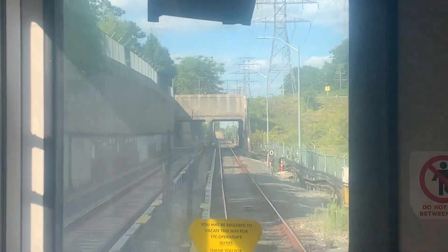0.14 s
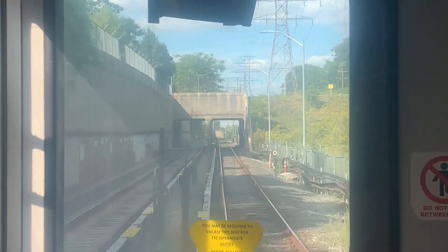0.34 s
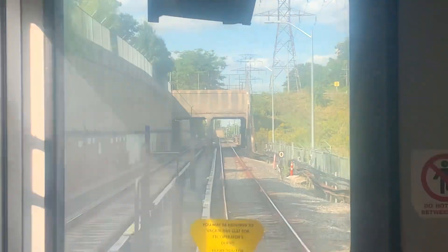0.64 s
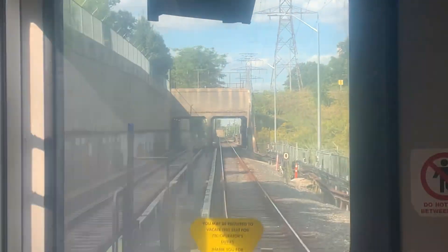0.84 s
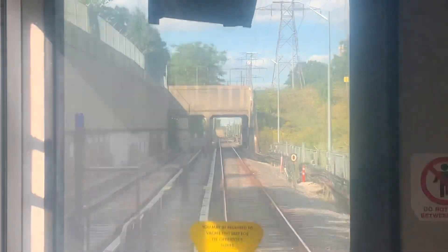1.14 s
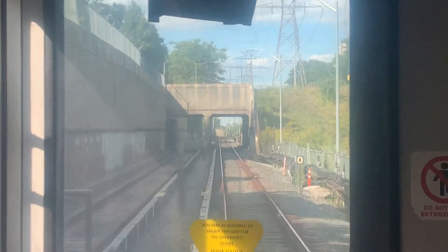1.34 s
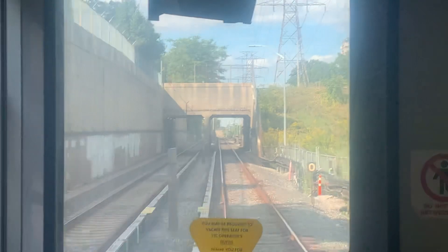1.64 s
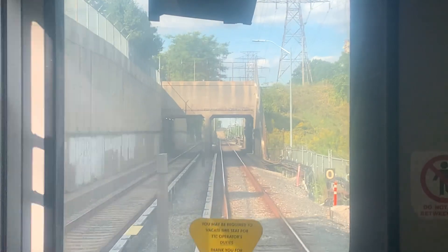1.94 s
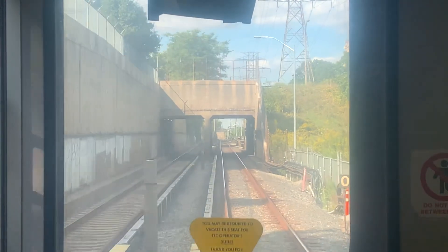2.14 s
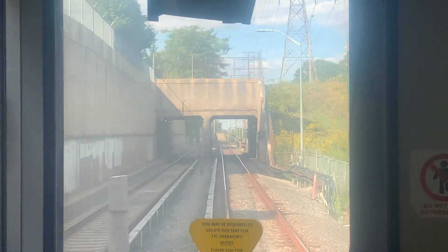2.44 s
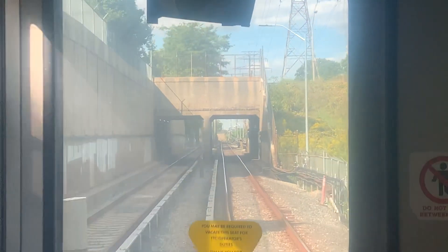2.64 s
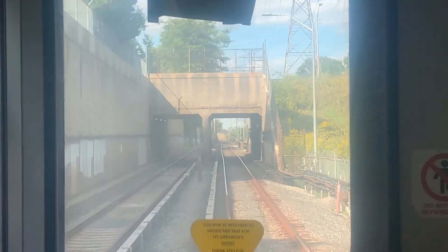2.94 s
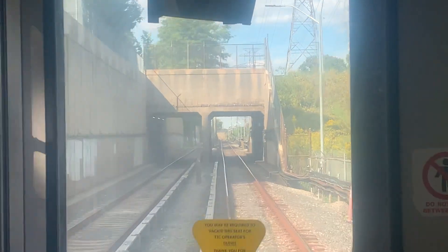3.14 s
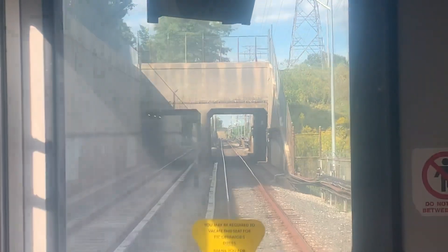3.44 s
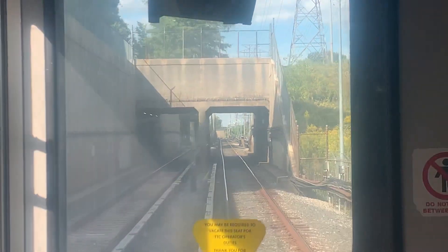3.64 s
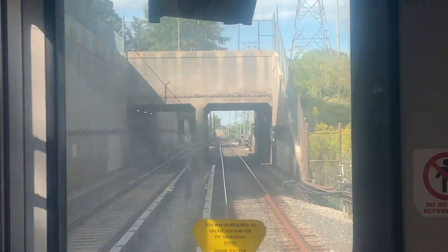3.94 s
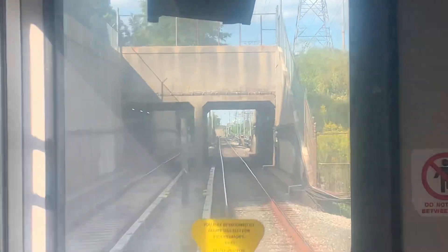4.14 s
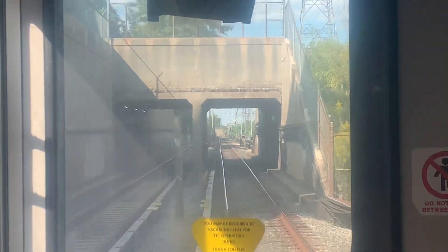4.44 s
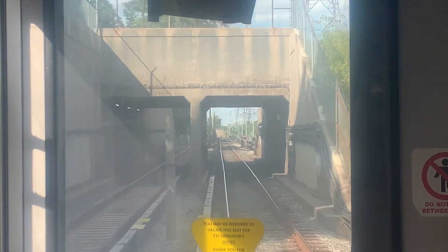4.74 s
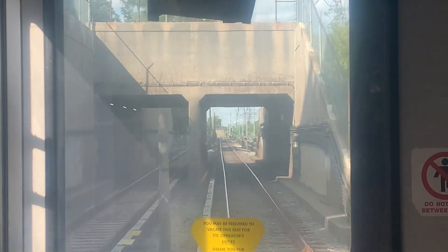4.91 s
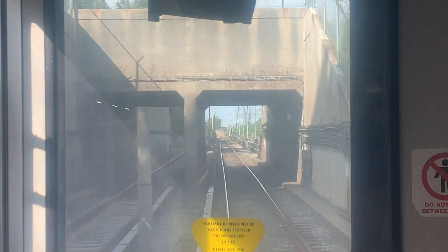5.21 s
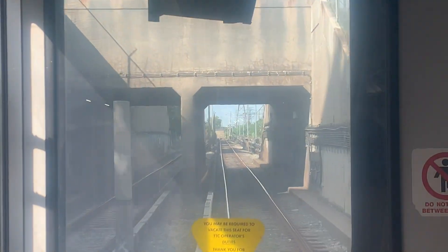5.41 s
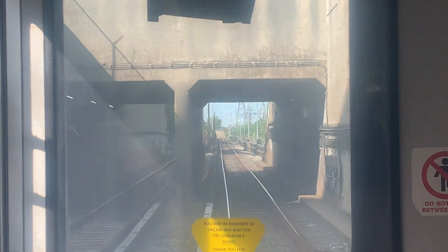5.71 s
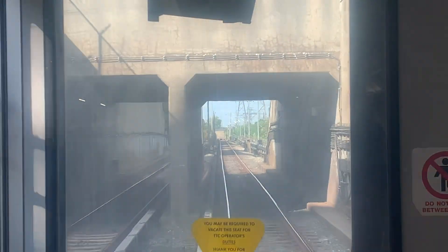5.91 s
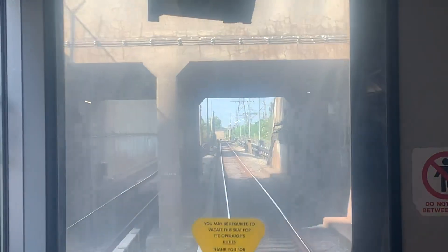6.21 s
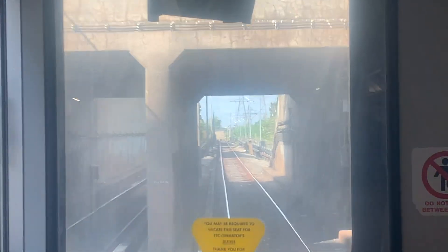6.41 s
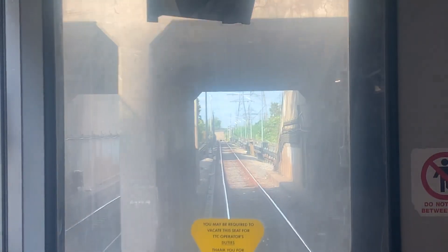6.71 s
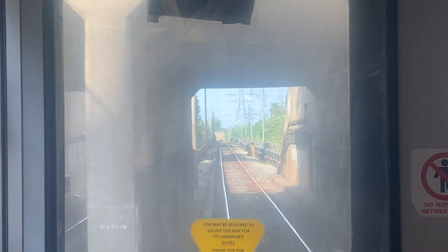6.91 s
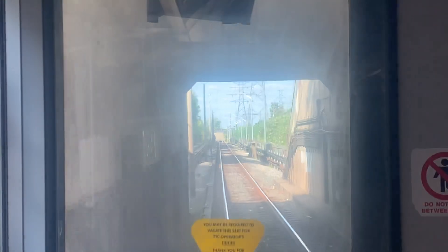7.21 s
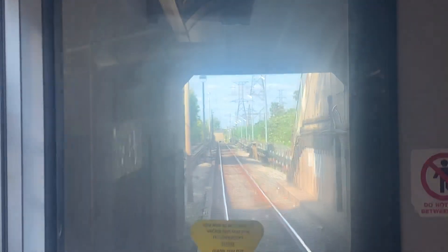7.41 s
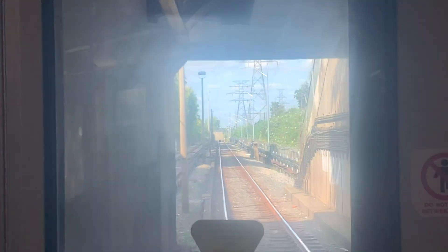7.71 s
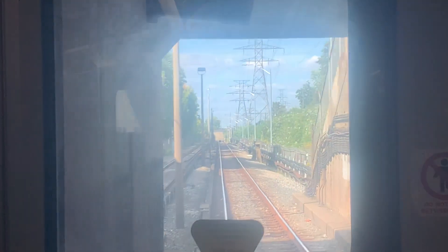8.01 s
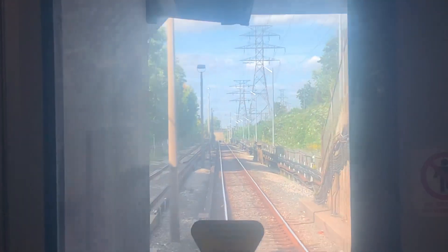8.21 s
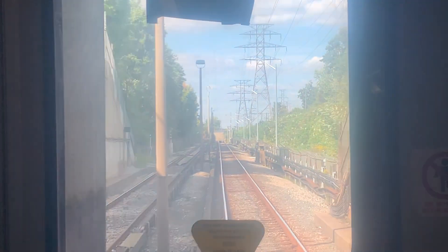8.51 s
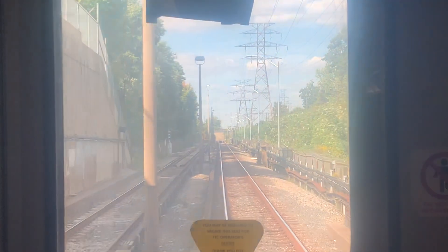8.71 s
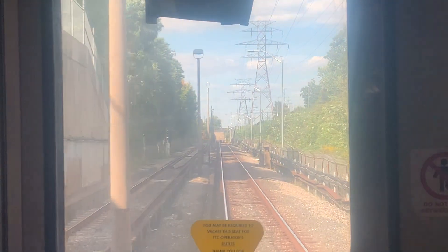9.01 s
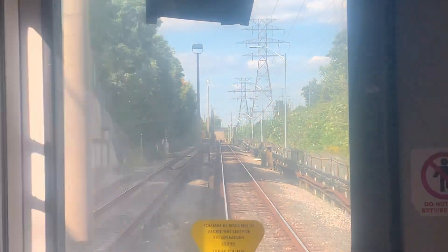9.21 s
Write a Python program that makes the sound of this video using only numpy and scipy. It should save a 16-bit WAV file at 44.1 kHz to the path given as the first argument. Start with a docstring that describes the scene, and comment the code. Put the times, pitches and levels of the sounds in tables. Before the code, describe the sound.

Inside the front car of a commuter train, a deep rumble, cabin drone and rough wheel roar run throughout. Loud, close panel knocks pop during the first three seconds while wheels crash over rail joints and air hisses in bursts at a door seal. A calmer stretch brings two small hollow taps, then the rolling swells under a bridge with rattling thumps and shuddering walls before easing. Close stereo microphone.

```python
"""Inside the front car of a rolling commuter train, 9.35 s, on two close microphone ports.
From the start noise bands boom, drone and roar; a loose panel near the ports knocks as falling sweeps until 3 s.
Wheels crash over joints from 1.1 to 3.7 s (shaped noise, ringing ticks), and air hisses in bursts at a door seal.
A thin tone swells at 2.2 s, and two hollow taps (decaying sines) follow at 4.8 s.
Near 7.6 s the rolling grows louder under a bridge, with more joints, floor thumps and wall shudders (short rings)."""
import sys
import numpy as np
from scipy import signal
from scipy.fft import rfft, irfft, next_fast_len
from scipy.io import wavfile
from scipy.ndimage import uniform_filter1d, minimum_filter1d, map_coordinates

SR = 44100
rng = np.random.default_rng(int(sys.argv[2]) if len(sys.argv) > 2 else 0)


def pcm_store(signal):
    """Save signal as 16-bit PCM."""
    levels = np.round(np.clip(np.atleast_2d(signal), -1, 1) * 32767)
    wavfile.write(sys.argv[1], SR, levels.astype(np.int16).T)


N = 412335  # length [samples]

# Body of the car rocking: (time [s], level [dB])
SWAY_LEVELS = [(0, -41), (1.3, -31.5), (1.85, -37), (2.11, -33), (6.8, -38), (7.58, -51), (9.35, -41)]
# Colour of the rocking: (frequency [Hz], relative density [dB per Hz])
SWAY_COLOUR = [(12, -21), (22, -3), (30, 0.5), (38, -2), (48, -18), (60, -100)]

# Rolling: (time [s], floor boom [dB], cabin drone [dB], wall hum [dB], wheel roar [dB])
ROLL_LEVELS = [(0.0, -23.5, -35, -32, -32.5), (0.23, -23.5, -25.5, -26.5, -34.5),
               (1.14, -21.5, -29, -28, -34), (1.38, -21.5, -23, -24.5, -31), (1.82, -22, -26.5, -30.5, -33),
               (2.11, -25.5, -26.5, -32.5, -33.5), (2.91, -21.5, -29, -30, -32),
               (3.41, -25.5, -27, -32, -34.5), (3.98, -24, -24.5, -34.5, -35),
               (4.69, -25.5, -27, -32, -34.5), (5.28, -26.5, -25.5, -32, -35.5),
               (5.8, -31, -26.5, -32.5, -34.5), (6.28, -23.5, -28, -32.5, -35),
               (6.59, -27.5, -26, -32, -34), (7.47, -24, -26.5, -31, -32), (7.66, -19.5, -22, -27.5, -30),
               (7.97, -19.5, -22.5, -29.5, -30), (8.41, -20.5, -24.5, -29.5, -32.5),
               (8.7, -24.5, -25.5, -27, -30), (9.35, -25, -24.5, -31, -34.5)]
# Colours of the four rolling layers: (frequency [Hz], relative density [dB per Hz])
BOOM_COLOUR = [(8.8, -43), (15, -33), (30, -28), (49, 1), (65, 0.5), (92, -11.5), (141, -10), (160, -10),
               (210, -21), (350, -120)]
DRONE_COLOUR = [(59, -24.5), (100, -2.5), (145, -6), (172, -6.5), (199, -4.5), (250, -7.5), (320, -14.5),
                (550, -120)]
HUM_COLOUR = [(140, -37), (230, -4.5), (344, -3), (371, -2.5), (430, 3.5), (451, -1.5), (471, -8),
              (520, -10.5), (680, -16.5), (1140, -120)]
ROAR_COLOUR = [(260, -57), (450, -16), (472, -43), (540, -15), (649, -9.5), (770, -5.5), (935, -11),
               (1170, -9), (1560, -12.5), (2770, -19.5), (3090, -22), (3370, -23), (3900, -28),
               (4400, -26.5), (5500, -35), (6800, -35), (8300, -50), (10800, -113), (18300, -120)]

# Ringing bands of wheel and rail: (frequency [Hz], half width [Hz], mean level [dB])
WHINE_BANDS = [(749, 35, -47), (1280, 100, -47.5), (2400, 110, -56), (4341, 50, -64)]
# Singing band near 3.4 kHz: (time [s], level [dB])
SING_LEVELS = [(0, -60), (.47, -74), (1.14, -69), (1.2, -49), (1.27, -58), (1.32, -47), (1.45, -53),
               (1.66, -64), (1.95, -53), (2.6, -45.5), (2.9, -54), (3.31, -68), (3.72, -46), (4.07, -59),
               (4.17, -45), (4.32, -63), (4.6, -45), (4.75, -53), (4.87, -48), (5.0, -51), (5.3, -52),
               (5.73, -61), (6.04, -55), (6.77, -60), (7.16, -58), (7.84, -60), (7.9, -47), (8.0, -56),
               (8.09, -45), (8.18, -60), (8.45, -51), (8.62, -49), (8.85, -41.5), (8.96, -66), (9.17, -60),
               (9.35, -42)]
# Thin tone that swells and stops: (time [s], level [dB])
FLARE_LEVELS = [(1.85, -77), (1.96, -52), (2.15, -41), (2.23, -70), (2.4, -80)]

# Bursts of air at the door seal: (time [s], length [s], level [dB])
AIR_BURSTS = [(0.022, 0.31, -47), (0.788, 0.11, -53.5), (1.145, 0.34, -50.5), (1.248, 0.16, -65),
              (1.532, 0.25, -48), (2.245, 0.021, -40), (2.676, 0.26, -44.5), (3.103, 0.026, -58),
              (3.514, 0.032, -47.5), (4.118, 0.054, -54), (7.21, 0.22, -56.5), (7.38, .04, -51),
              (7.607, 0.035, -52), (7.84, 0.14, -37.5), (7.977, 0.16, -50.5), (9.2, 0.22, -41)]
# Hiss both ports share: (frequency [Hz], relative density [dB per Hz])
HISS_SHARED = [(2650, 1), (4500, 1.5), (5740, 1.5), (7220, 3.5), (8040, 2.5), (8470, -44), (8580, -36),
               (8730, -51), (8960, -7), (9980, 5.5), (11400, -6), (12300, -11), (12700, -15), (16500, -40),
               (22000, -120)]
# Hiss in opposite phase at the two ports: (frequency [Hz], relative density [dB per Hz])
HISS_OPPOSED = [(2650, -34), (4500, 2.5), (6230, -1.5), (8010, 2.5), (9080, 9.5), (10500, -16),
                (10700, -16), (11000, -56), (11300, -26), (11500, -35), (12700, -0.5), (16500, -31),
                (22000, -120)]
# Steady thin hiss: (frequency [Hz], relative density [dB per Hz])
DRAUGHT_COLOUR = [(5000, -55), (6500, -17), (8000, 10), (9500, -12), (10300, -9), (10800, -64)]

# Small hollow taps: (time [s], relative level [dB])
TAP_TIMES = [(4.815, -16.5), (4.876, -17.5)]
# What the taps ring with: (frequency [Hz], mean level [dB], time to fall 60 dB [s])
HOLLOW_MODES = [(395, 1, 0.082), (540, -1, 0.052), (810, -8, 0.034)]

# Floor dropping onto its springs: (crest time [s], relative level [dB], pitch [Hz])
FLOOR_BUMPS = [(0.079, -9, 62.6), (0.443, -14.5, 78), (0.488, -11, 66), (0.561, -14.5, 92),
               (0.605, -15.5, 69.5), (0.692, -23, 76.4), (0.774, -15, 69), (0.813, -15.5, 73.6),
               (1.235, -14, 88.5), (1.345, -8.5, 76.6), (1.847, -13, 74.5), (2.702, -13.5, 56.7),
               (2.816, -20, 69), (2.951, -17, 75.5), (3.038, -16, 60.5), (3.545, -22, 70),
               (3.833, -15, 65.6), (4.176, -14.5, 70.4), (4.33, -14, 67), (4.52, -23, 67), (5.172, -14, 63),
               (5.39, -16, 67), (6.112, -13, 72), (6.233, -14.5, 73), (6.275, -14, 62), (6.445, -13, 65),
               (6.545, -16, 62), (7.435, -9, 83), (7.468, -9.5, 78), (7.52, -13, 81.4), (7.582, -6, 71.5),
               (7.634, -9, 81), (7.687, -7.5, 74), (7.767, -5, 78), (7.854, -13, 83), (7.943, -5.5, 72),
               (7.992, -9, 73.6), (8.028, -12, 72.6), (8.117, -9, 79.4), (8.159, -6, 74), (8.242, -16, 82),
               (8.324, -13.5, 68.6), (8.376, -14, 83.5), (8.415, -15, 85), (8.583, -12.5, 76.6)]
# Walls shuddering: (crest time [s], relative level [dB], pitch [Hz])
WALL_SHUDDERS = [(0.378, -12, 172), (0.434, -15, 346), (0.455, -15, 147), (0.485, -11, 170),
                 (0.605, -14, 161), (0.461, -12, 400), (0.559, -22, 350), (0.734, -17, 253),
                 (0.892, -13, 270), (1.168, -12, 350), (1.229, -28, 298), (1.306, -16, 333),
                 (1.33, -2, 288), (1.512, -21, 310), (1.565, -19, 285), (1.609, -23, 260),
                 (1.699, -10.5, 275), (1.727, -27, 308), (1.788, -20, 264), (2.295, -17.5, 300),
                 (2.315, -21, 280), (2.352, -14, 258), (3.22, -14, 336), (3.541, -14, 275),
                 (4.225, -19, 277), (4.395, -18, 242), (6.1, -17, 250), (6.3, -17.5, 292),
                 (6.368, -15, 169), (7.436, -9, 276), (7.462, -14, 302), (7.51, -14, 340),
                 (7.541, -10, 305), (7.647, -3.5, 293), (7.678, -7.5, 316), (7.732, -6, 342),
                 (7.755, -11.5, 290), (7.787, -16.5, 267), (7.842, -19, 330), (7.905, -15, 257),
                 (7.955, -31, 275), (8.05, -16, 324), (8.094, -16, 294), (8.146, -9.5, 290),
                 (8.178, -14, 333), (8.247, -15, 286), (8.363, -11.5, 322), (8.557, -13, 277)]

# Wheel blows: (time [s], rise [s], clatter [relative dB], clang [relative dB], thud [relative dB])
JOINT_BLOWS = [(1.115, 0.018, -26.5, -19.5, -22), (1.146, 0.016, -19.5, -15, -8.5),
               (1.205, .02, -26, -29, -13.5), (1.287, 0.014, -16, -16.5, -4), (1.345, 0.02, -28, -30, -33),
               (1.39, .014, -35, -41, -29), (1.537, 0.011, -25.5, -19, -28),
               (1.6836, 0.012, -46, -22, -15.5), (2.27, .012, -28, -23.5, -16.5),
               (2.292, 0.0067, -24.5, -42, -26), (2.673, 0.0093, -21, -42, -18),
               (3.088, 0.0082, -26, -31, -18), (3.473, 0.011, -25.5, -40, -20),
               (3.65, 0.012, -26, -40, -23), (7.4016, 0.013, -22.5, -26, -18.5),
               (7.615, 0.016, -18.5, -22, -12.5), (7.665, .014, -35.5, -32, -27),
               (7.75, .014, -45, -42, -33), (7.875, .02, -23, -34, -28), (7.97, .014, -33, -31, -21),
               (8.05, 0.023, -20, -27, -19), (8.095, 0.013, -31, -34, -24), (8.2994, .014, -26.5, -38, -13),
               (8.5644, .014, -43, -32, -31)]
# Colours of clatter and thud: (frequency [Hz], relative density [dB per Hz])
CLATTER_COLOUR = [(590, -41), (1000, 1), (1180, -4.5), (1340, -3.5), (1490, -6), (1880, 0.5), (2350, 0),
                  (2750, -4.5), (3310, -5), (3580, -12), (4350, -11), (5470, -19.5), (6520, -22),
                  (8200, -43), (10700, -82), (18000, -120)]
THUD_COLOUR = [(65, -42), (110, 7.5), (216, -1), (303, 1), (481, -1), (620, -14.5), (810, -38),
               (1360, -120)]
# What the struck wheel rings with: (frequency [Hz], width [Hz], relative level [dB])
WHEEL_MODES = [(1384, 54, 0.5), (1670, 65, 2.5), (1920, 70, -2), (2190, 70, -5.5), (2357, 22, -2.5),
               (2910, 50, -9), (3110, 50, -16), (3260, 54, -8), (3520, 60, -12), (4320, 50, -11),
               (5060, 90, -17)]

# Loose panel close to the ports: (time [s], relative level [dB], rise [s], length [s])
PANEL_KNOCKS = [(0.0225, -4.5, .0057, .0178), (0.135, -5, .0064, .0168), (0.8652, -2.5, .0054, .0156),
                (0.9646, -7, .0054, .0162), (1.185, -8.5, .0041, .0198), (1.3679, -1, .0045, .017),
                (1.4524, -3.5, .0046, .0172), (2.4626, -2.5, .0057, .017), (2.5611, -7, .0062, .0175),
                (2.7267, -1, .0059, .0167), (2.7722, -15, .0055, .017), (2.8682, -0.5, .0044, .0159),
                (2.9493, -11.5, .006, .0142)]

# Likeness of the two ports: (frequency [Hz], left-right correlation [-1 to 1])
PORT_LIKENESS = [(40, 0.94), (85, 0.98), (130, 0.74), (300, 0.85), (500, 0.065), (800, 0), (8000, 0.011)]
# Colour difference of the two ports: (frequency [Hz], left minus right [dB])
PORT_LEAN = [(30, -3.5), (60, -1.5), (110, 2), (200, -0.5), (350, 1.0), (640, 1.5), (1150, 2.5), (2080, 3),
             (3750, -1), (6770, -2.5), (12200, 0)]

GLINT_DB, GLINT_S = -7, 0.035  # level against the roar [dB]; a glint crests at half this time [s]
DRIFT = 0.018  # pitch wander of the ringing bands [share of pitch]
SING_HZ, SING_HALF_WIDTH_HZ = 3400, 210
FLARE_HZ, FLARE_HALF_WIDTH_HZ = 2400, 14
PUFF_ATTACK_S, PUFF_T60_S, LEAK_DB = 0.052, 0.37, -61.5  # rise, dying away, mean leak between bursts
JOINT_T60_S = 0.37  # the clatter's tail falls 60 dB in this time
CHATTER_PER_S, CHATTER_DB = 300, -5
KNOCK_HZ = 171  # the pitch each knock ends on
PORT_LEAD_S = 0.00024  # the panel is nearer the left port, which hears it this much earlier
TOP_HZ = 12823  # upper band limit


def amp(db):
    """Decibels to gain."""
    return 10 ** (np.asarray(db) / 20)


def unit(x):
    """Scaled to rms 1."""
    return x / np.sqrt(np.mean(x ** 2) + 1e-20)


def along(points, hz):
    """(frequency [Hz], value) points read on a log frequency axis."""
    f, v = np.transpose(points)
    return np.interp(np.log(hz + 1), np.log(f + 1), v)


def curves(rows):
    """One value per sample for each column after the time."""
    s, *columns = np.transpose(rows)
    return [np.interp(np.arange(N) / SR, s, column) for column in columns]


def wobble(rate):
    """A smooth random curve through `rate` random knots a second."""
    knots = rng.standard_normal(int(N * rate / SR) + 4)
    return map_coordinates(knots, [np.arange(N) * rate / SR])


def filtered(x, response):
    """x shaped by a response given as a function of frequency [Hz]."""
    m = next_fast_len(N + SR // 2)
    return irfft(rfft(x, m) * response(np.fft.rfftfreq(m, 1 / SR)), m)[..., :N]


def patchy(patchy_db):
    """Two unrelated white noises under one field of random gain patches in time and frequency."""
    z = signal.stft(rng.standard_normal((2, N)), nperseg=512)[2]
    field = rng.standard_normal(z.shape[1:])
    field = uniform_filter1d(field, size=5, axis=0)
    field = uniform_filter1d(field, size=12, axis=1)
    return signal.istft(z * amp(patchy_db * unit(field)), nperseg=512)[1][:, :N]


def rush(spectrum, alike, patchy_db):
    """Stereo noise of rms 1 with a given colour and left-right likeness."""
    def mid_side(hz):
        turn = np.arccos(np.clip(along(alike, hz), -1, 1)) / 2  # more side makes the ports less alike
        return amp(along(spectrum, hz)) * np.array([np.cos(turn), np.sin(turn)])

    mid, side = filtered(patchy(patchy_db), mid_side)
    return unit(np.array([mid + side, mid - side]))


def band(hz, half_width, alike):
    """Stereo noise of rms 1 in one resonance, at half amplitude `half_width` from its centre."""
    mid, side = filtered(rng.standard_normal((2, N)), lambda f: 1 / (1 + ((f - hz) / half_width) ** 2))
    turn = np.arccos(np.clip(alike, 0, 1)) / 2
    return unit(np.cos(turn) * mid + np.sin(turn) * side * np.array([[1], [-1]]))


def drifting(x):
    """x played slightly faster and slower, so that its pitch wanders."""
    speed = 1 + DRIFT * wobble(3)
    place = np.clip(np.cumsum(speed) * (N - 1) / speed.sum(), 0, N - 1)
    return np.array([map_coordinates(side, [place]) for side in x])


def sway():
    """The whole body rocks: the lowest rumble, felt more than heard."""
    level_db, = curves(SWAY_LEVELS)
    return amp(level_db + 4.7 * wobble(2.66)) * rush(SWAY_COLOUR, PORT_LIKENESS, patchy_db=0.5)


def glints(count):
    """Brief soft tones at random pitches and sides, adding a grainy shimmer to the roar; rms 1."""
    out, t = np.zeros((2, N + SR)), np.arange(SR // 8) / SR
    swell = t / GLINT_S * np.exp(-t / GLINT_S * 2)
    for when, pitch, size, side in rng.random((count, 4)):
        hz = 600 * 8 ** pitch  # 600 to 4800 Hz
        level = amp(along(ROAR_COLOUR, hz) + 4.5 * size) * np.sqrt(hz)
        tone = level * swell * np.sin(2 * np.pi * hz * t)
        pan = np.array([[np.cos(np.pi * side)], [np.sin(np.pi * side)]])
        out[:, round(when * N):][:, :len(t)] += tone * pan
    return unit(out[:, :N])


def rolling():
    """Rough rail shakes the floor, the cabin air, the walls and the wheels; all share the jolts."""
    boom_db, drone_db, hum_db, roar_db = curves(ROLL_LEVELS)
    jolt = wobble(8.7)
    boom_gain = amp(boom_db + 1.2 * jolt + 0.6 * wobble(6))
    drone_gain = amp(drone_db + 1.1 * jolt + 0.4 * wobble(9))
    hum_gain = amp(hum_db + 0.88 * jolt + 1.0 * wobble(12))
    roar_gain = amp(roar_db + 0.11 * jolt + 0.08 * wobble(27))
    boom = boom_gain * rush(BOOM_COLOUR, PORT_LIKENESS, patchy_db=0.4)
    drone = drone_gain * rush(DRONE_COLOUR, PORT_LIKENESS, patchy_db=0.6)
    hum = hum_gain * rush(HUM_COLOUR, PORT_LIKENESS, patchy_db=0.2)
    wheels = rush(ROAR_COLOUR, PORT_LIKENESS, patchy_db=1.45) + amp(GLINT_DB) * glints(count=1500)
    return boom + drone + hum + roar_gain * unit(wheels)


def singing():
    """Resonant bands of noise swell and flicker, each on its own; all but the thin tone wander in pitch."""
    bands = np.zeros((2, N))
    for hz, half_width, db in WHINE_BANDS:
        gain = amp(db + 1.2 * wobble(2.45) + 1.5 * wobble(9))
        bands += gain * drifting(band(hz, half_width, alike=0))
    flare_db, = curves(FLARE_LEVELS)
    bands += amp(flare_db + 2.5 * wobble(20)) * band(FLARE_HZ, FLARE_HALF_WIDTH_HZ, alike=0.5)
    sing_db, = curves(SING_LEVELS)
    sing = drifting(band(SING_HZ, SING_HALF_WIDTH_HZ, alike=0))
    return bands + amp(sing_db + 1.5 * wobble(14)) * sing


def puffs():
    """Gain of the leak: each burst rises, holds and dies away over a flickering trickle."""
    t = np.arange(N) / SR
    gain = amp(LEAK_DB + 2.0 * wobble(7))
    for s, length, db in AIR_BURSTS:
        rise = np.clip((t - s) / PUFF_ATTACK_S, 0, 1) ** 2
        fall_db = -60 * np.clip(t - s - length, 0, None) / PUFF_T60_S
        gain = gain + rise * amp(db + fall_db)
    return gain


def hiss():
    """Air leaks at the door seal: airy hiss of shared and opposed noise, each with its own colour and gaps."""
    def mid_side(hz):
        return amp([along(HISS_SHARED, hz), along(HISS_OPPOSED, hz) + 1.4])

    mid, side = filtered(patchy(patchy_db=3.5), mid_side)
    air = unit(np.array([mid + side, mid - side]))
    bursts = puffs() * amp(0.37 * wobble(24)) * air
    opposite = [(8000, -1.0)]  # one likeness for all frequencies
    draught = amp(-60 + 0.8 * wobble(6)) * rush(DRAUGHT_COLOUR, opposite, patchy_db=8.0)
    return bursts + draught


def taps():
    """Something small and hollow is tapped twice; its modes ring and die away."""
    out, t = np.zeros(N + SR), np.arange(SR // 8) / SR
    for s, db in TAP_TIMES:
        ring = np.zeros(len(t))
        for hz, level_db, t60 in HOLLOW_MODES:
            fade = amp(level_db + rng.normal(0, 2.2) - 60 * t / t60)
            ring += fade * np.sin(2 * np.pi * hz * t)
        out[round(s * SR):][:len(t)] += amp(db) * (1 - np.exp(-t / 0.0031)) * ring
    return out[:N]


def thumps(rows, rise_cycles, fall_cycles, rough):
    """Short low rings that swell to a crest and die, sagging in pitch and roughened, each struck afresh."""
    out, t = np.zeros(N + SR), np.arange(-SR // 20, SR // 10) / SR  # the crest is at t = 0
    for s, db, hz in rows:
        swell = (t * hz / rise_cycles) ** 2
        decay = np.abs(t * hz / fall_cycles) ** 0.96
        shape = np.exp(-np.where(t < 0, swell, decay))
        turn, sag = rng.random(2)
        wander = np.cumsum(rng.standard_normal(len(t))) * rough / np.sqrt(SR / hz)
        phase = 2 * np.pi * (hz * t * (1 - sag * t) + turn)
        wave = np.sin(phase + uniform_filter1d(wander, size=40))
        out[round(s * SR) - SR // 20:][:len(t)] += amp(db) * shape * wave
    return out[:N]


def bumps():
    """The floor drops onto its springs in deep thumps; the walls shudder higher, a little louder at left."""
    floor = amp(-2.5) * thumps(FLOOR_BUMPS, rise_cycles=0.97, fall_cycles=1.66, rough=0.6)
    walls = amp(-4.0) * thumps(WALL_SHUDDERS, rise_cycles=1.96, fall_cycles=3.1, rough=0.53)
    return floor + walls * amp([[0.6], [-0.6]])


def chatter(strength):
    """Scattered metal contacts of uneven size ring the wheel, harder where the blow is strong."""
    ticks = (rng.random((2, N)) < CHATTER_PER_S / SR) * rng.standard_normal((2, N))

    def modes(f):
        total = 0
        for k, (hz, width, db) in enumerate(WHEEL_MODES):
            resonance = 1j * f * width / (hz * hz - f * f + 1j * f * width)
            total = total + (-1) ** k * amp(db) * resonance  # neighbours in opposite sign
        return total

    return filtered(strength * ticks, modes) / np.std(filtered(ticks, modes))


def joints():
    """A wheel hits a joint: a rattling clatter and a clang come first, the car body swells into a thud after."""
    t = np.arange(N) / SR
    clatter, clang, thud = np.zeros((3, N))
    for s, rise, clatter_db, clang_db, thud_db in JOINT_BLOWS:
        u = np.clip(t - s, 0, None)  # time since the blow [s]
        fade = amp(-60 * u / JOINT_T60_S)
        onset = 1 - np.exp(-(u / rise) ** 2)
        clatter += amp(clatter_db - 8) * (fade + 0.44 * np.exp(-u / 0.031)) * onset
        clang += amp(clang_db - 9.0) * np.sqrt(fade) * (1 - np.exp(-u / rise))
        thud += amp(thud_db - 10) * (u / 0.047) ** 1.02 * np.exp(1.5 - 1.45 * u / 0.037)
    grit = uniform_filter1d(rng.standard_normal(N), size=150)
    grit = unit(uniform_filter1d(grit, size=150))
    rattle = amp(1.2 * wobble(38) + 1.6 * grit - 1)
    rattling = clatter * rush(CLATTER_COLOUR, PORT_LIKENESS, patchy_db=0.7)
    ringing = clang * (band(734, 133, alike=0) + amp(-7.5) * band(1300, 110, alike=0))
    lumps = amp(2.5 * wobble(30))
    body = thud * lumps * rush(THUD_COLOUR, PORT_LIKENESS, patchy_db=1)
    return rattle * (rattling + ringing) + amp(CHATTER_DB) * chatter(clatter) + body


def panel():
    """Bending waves spread by pitch: each knock arrives high, sweeps down in milliseconds and buzzes out."""
    out, t = np.zeros(N + SR), np.arange(SR // 10) / SR
    body = signal.butter(2, [130, 650], "bandpass", fs=SR, output="sos")
    sweep_hz = KNOCK_HZ * (1 + 9.8 * np.exp(-t / 0.00207))
    phase = 2 * np.pi * np.cumsum(sweep_hz) / SR
    buzz_gain = amp(-12.0 - 60 * t / 0.04) * (1 - np.exp(-t / 0.0048))
    for s, db, rise, length in PANEL_KNOCKS:
        wave = np.sin(phase + rng.normal(0, 0.08))  # always pushed the same way
        shape = (1 - np.exp(-(t / rise) ** 2.9)) * np.exp(-(t / length) ** 8.9)
        knock = 1.3 * np.tanh(0.75 * shape * wave)  # the panel stiffens at full swing
        buzz = unit(signal.sosfilt(body, rng.standard_normal(len(t)))) * buzz_gain
        out[round(s * SR):][:len(t)] += amp(db) * (knock + buzz)
    sides = np.array([[1], [-1]])  # left early, right late, by half the lead each
    return filtered(out[:N], lambda f: np.exp(1j * np.pi * f * PORT_LEAD_S * sides))


def scene():
    """Everything heard in the car, from the far rumble to the panel near the ports."""
    return sway() + rolling() + singing() + hiss() + taps() + bumps() + joints() + panel()


def record(dry):
    """The ports differ a little in colour; a limiter ducks on peaks and recovers; a band limit cuts the top."""
    halves = np.array([[0.5], [-0.5]])
    x = filtered(dry, lambda hz: amp(along(PORT_LEAN, hz) * halves))
    need = np.minimum(1, 0.92 / (np.abs(x).max(axis=0) + 1e-9))
    held = minimum_filter1d(need, size=1301, origin=500)  # about 3 ms look-ahead, 26 ms hold
    return filtered(x * uniform_filter1d(held, size=201), lambda hz: hz < TOP_HZ)


dry = scene()
out = record(dry)
pcm_store(out)
```